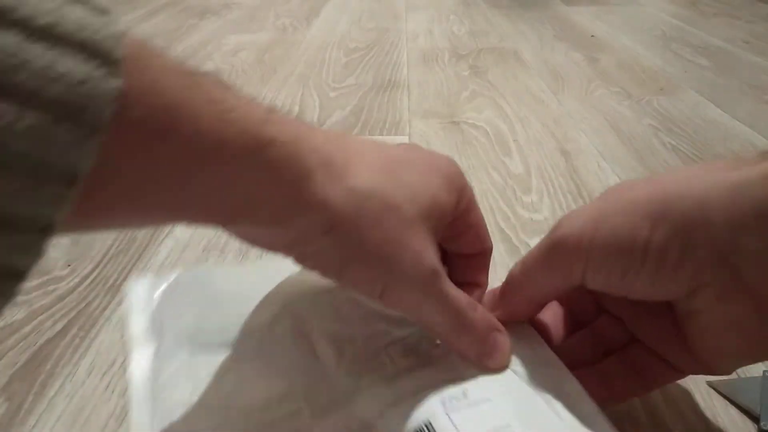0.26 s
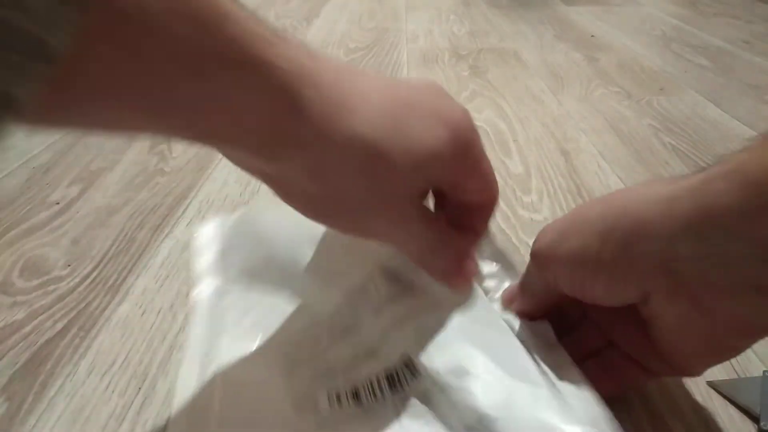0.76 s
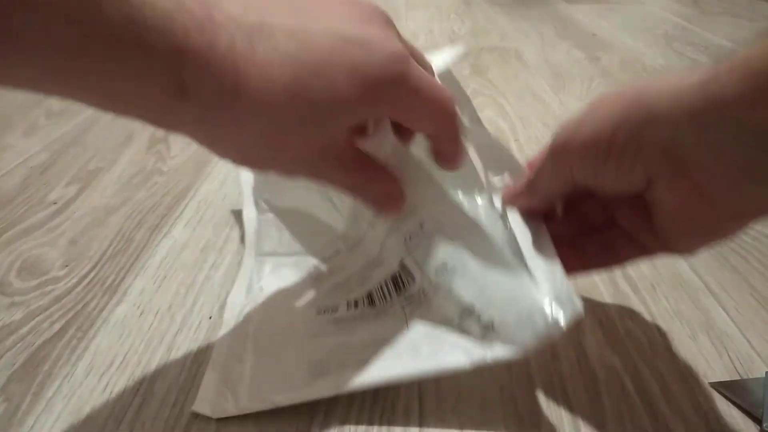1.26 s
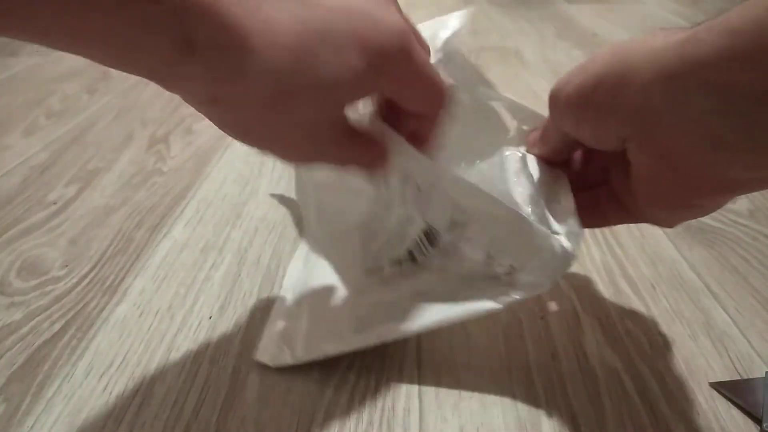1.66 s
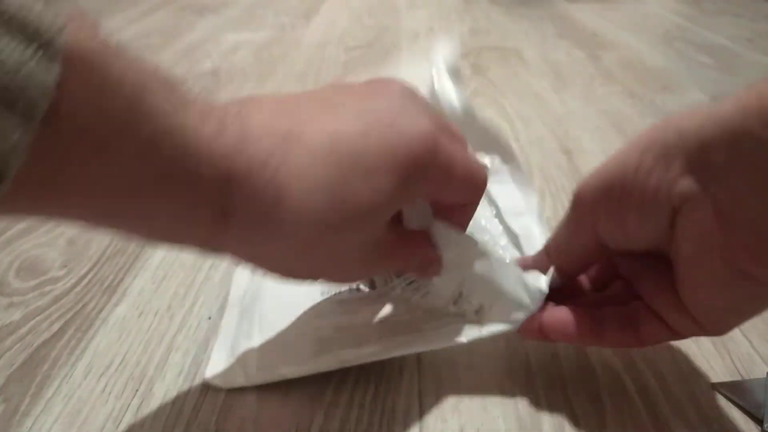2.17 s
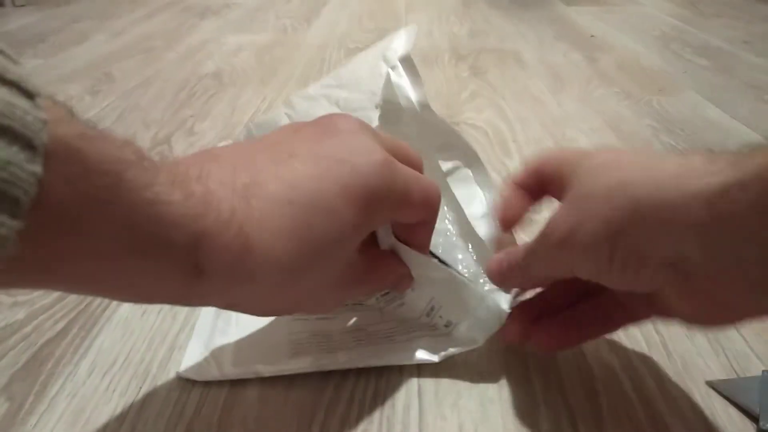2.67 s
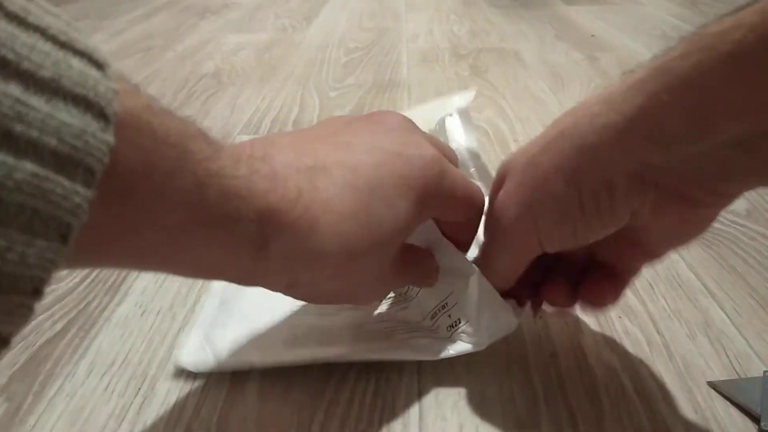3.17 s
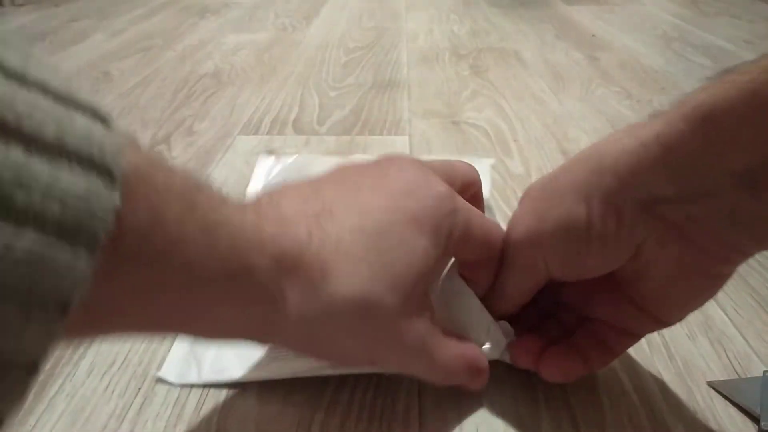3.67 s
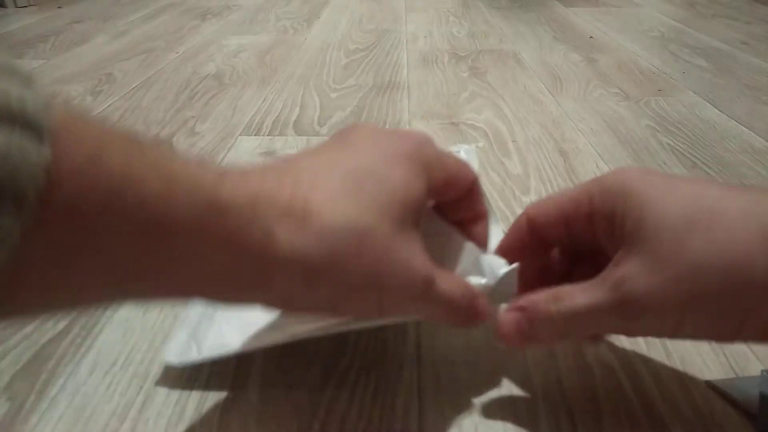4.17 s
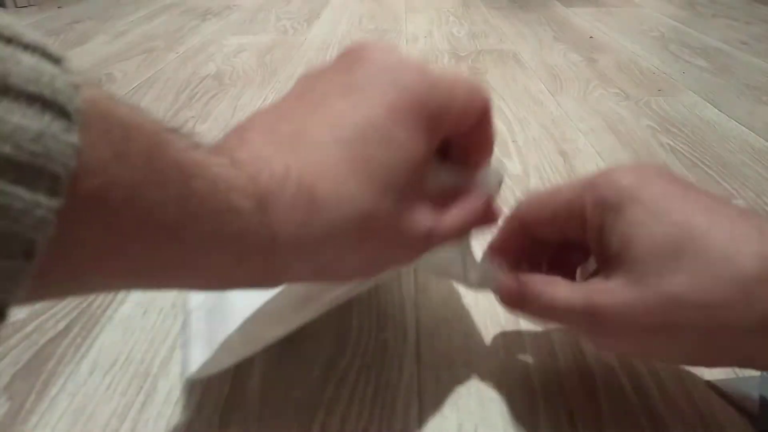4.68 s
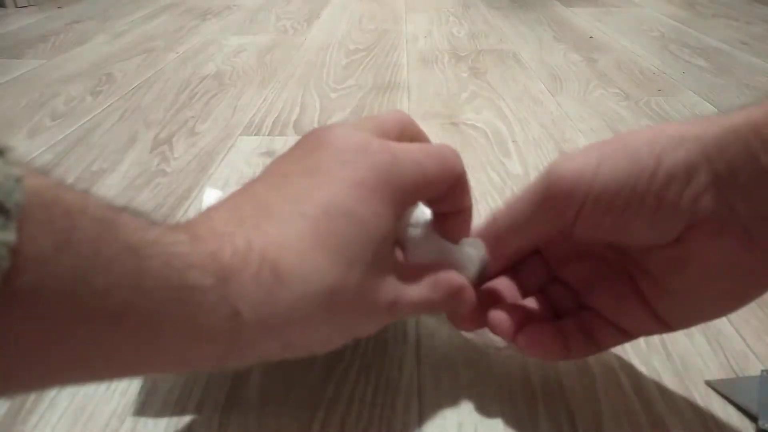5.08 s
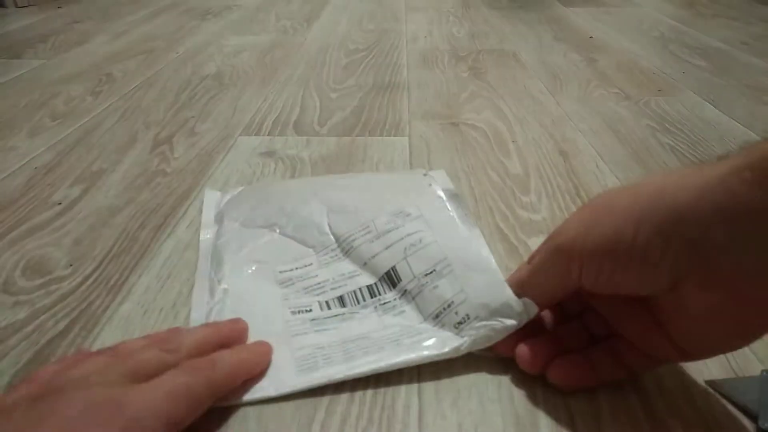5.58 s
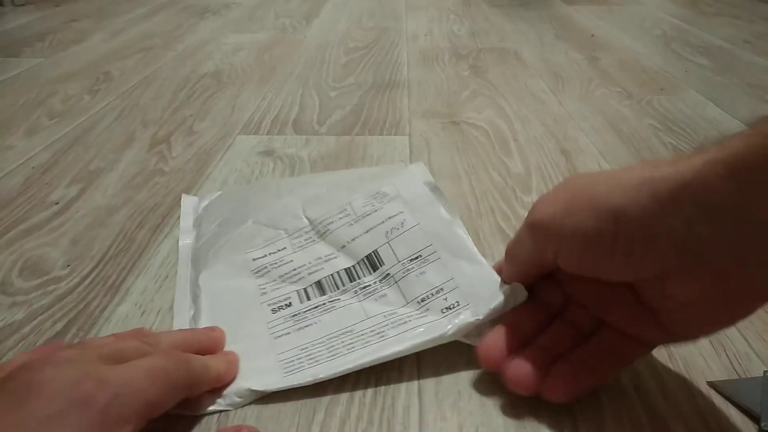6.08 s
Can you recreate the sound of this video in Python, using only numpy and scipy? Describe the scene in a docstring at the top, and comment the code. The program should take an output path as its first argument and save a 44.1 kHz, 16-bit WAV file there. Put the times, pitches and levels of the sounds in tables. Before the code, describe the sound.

A padded plastic mailer is pulled and torn open by hand, crinkling and rustling with sharp snaps, close up in a quiet room.

```python
"""A padded plastic mailer snaps and crackles as hands pull and tear it on a laminate floor.
Creases in the film buckle: large ones as separate snaps, countless small ones as crackle over rubbing hiss.
Broad panels flap and drag with a duller, hollow rustle; film swishes on film; the bag bumps the floor.
A quiet room answers. The two-port microphone is close."""
import sys
import numpy as np
from scipy import signal
from scipy.fft import rfft, irfft
from scipy.io import wavfile

SR = 44100
rng = np.random.default_rng(int(sys.argv[2]) if len(sys.argv) > 2 else 0)


def waveform_to_disk(signal):
    """Save audio, clipped to [-1, 1], as 16-bit WAV at the path in sys.argv[1]."""
    frames = np.transpose(np.atleast_2d(signal))
    scaled = np.clip(frames, -1, 1) * 32767
    samples = np.round(scaled).astype(np.int16)
    wavfile.write(sys.argv[1], SR, samples)


N = 278712
PORT_LAG_S, PORT_LAG_SPREAD_S = .00003, .00005   # left behind right; scatter over the bag
TUG_RISE_S, TUG_FALL_S = 0.014, 0.031   # time constants

# Large creases buckling: start_s, crack_db, ring_db, ring_hz, flap_db
SNAPS = [(0.0288, -21.5, -26, 3650, -53), (0.237, -42, -33, 1860, -43), (0.268, -23, -40, 1710, -34),
         (0.279, -18, -24.5, 4340, -28.5), (0.409, -25.5, -28, 1930, -31), (0.579, -24.5, -43, 2100, -36),
         (0.611, -27, -34, 1900, -46), (0.6352, -54, -65, 1160, -29.5), (0.6997, -19.5, -50, 2000, -48),
         (0.8397, -19, -23.5, 2100, -18.5), (0.8616, -23, -31, 1770, -16.5), (0.876, -36, -32, 1140, -26),
         (0.9012, -12.5, -27, 1920, -41), (0.954, -23.5, -39, 3340, -58), (1.155, -24, -33, 4600, -60),
         (1.329, -8, -45, 1130, -40), (1.4247, -23, -52, 3850, -41), (1.52, -17, -58, 1470, -25.5),
         (1.5608, -20, -34, 2680, -38), (1.631, -14, -22.5, 3680, -26.5), (1.969, -22, -32, 3900, -44),
         (2.199, -18, -41, 4350, -61), (2.279, -40, -45, 885, -51), (2.2966, -25, -27, 4070, -25),
         (2.3108, -18, -36, 3200, -58), (2.3143, -33, -41, 3700, -56), (2.321, -42, -34, 3900, -60),
         (2.339, -30.5, -28.5, 3340, -36), (2.5564, -32, -64, 1160, -35.5), (2.706, -39, -52, 1090, -35.5),
         (2.9469, -17.5, -37.5, 2100, -63), (2.9585, -25, -44, 3500, -60),
         (2.9828, -17.5, -24.5, 4100, -34), (3.0027, -19, -46, 4000, -37.5), (3.041, -23.5, -54, 4600, -65),
         (3.061, -20, -40, 3570, -65), (3.1324, -30.5, -34, 3000, -62), (3.181, -31, -46, 4300, -40.5),
         (3.3142, -40, -37, 2530, -44), (3.3337, -4, -27, 3490, -25), (3.345, -40, -44, 550, -38),
         (3.366, -40, -45, 390, -50), (3.371, -24.5, -48, 3000, -47), (3.41, -46, -42, 1120, -47),
         (3.4148, -46, -37.5, 2400, -40), (3.4325, -22, -33.5, 3570, -34.5), (3.4569, -23, -37, 3600, -33),
         (3.558, -27, -36, 3400, -38), (3.7075, -25, -43, 3600, -37.5), (3.784, -27, -38, 2530, -36),
         (3.847, -25.5, -38.5, 3770, -47), (3.9064, -11.5, -17.5, 4550, -31), (3.9203, -23, -42, 3700, -55),
         (3.929, -19, -40, 4570, -60), (4.002, -28, -46, 3630, -40), (4.0193, -22, -44, 1070, -67),
         (4.032, -20.5, -31.5, 2900, -50), (4.057, -24.5, -42, 2620, -56), (4.1716, -15, -39, 3370, -47),
         (4.1822, -14, -28, 4250, -48), (4.206, -25, -50, 3650, -60), (4.281, -27, -37.5, 1810, -39.5),
         (4.4084, -24, -48, 3890, -48), (4.45, -19.5, -29, 4100, -60), (4.4543, -20, -33, 4100, -60),
         (4.556, -23.5, -45, 4000, -60), (4.649, -32, -32, 3900, -55), (4.474, -16, -24, 4150, -50),
         (4.5072, -22, -20, 3630, -30.5), (4.514, -21, -48, 2210, -66), (4.5593, -7.5, -32, 3500, -35),
         (4.5645, -12, -48, 3900, -53), (4.606, -14, -25, 3580, -35), (4.613, -19, -31, 4030, -52),
         (4.675, -9, -20, 4800, -35), (4.6818, -15, -33, 3870, -37), (4.6843, -16, -50, 3000, -26.5),
         (4.697, -25, -39, 4030, -32), (4.742, -49, -50, 3000, -37), (4.805, -21.5, -63, 1510, -37),
         (4.844, -35, -45, 1640, -38), (4.97, -26, -36.5, 4500, -48), (5.0451, -11.5, -31, 5100, -35.5),
         (5.2338, -27, -40.5, 1760, -33.5), (5.276, -25.5, -40.5, 3530, -60),
         (5.4, -34, -32.5, 1980, -35.5), (5.401, -16.5, -27.5, 4300, -42), (5.5035, -44, -51, 1940, -35),
         (5.5982, -48, -37, 4600, -40), (5.6494, -35, -39, 3840, -55), (5.721, -31, -51, 4200, -51),
         (5.8381, -22.5, -25, 3700, -34), (5.879, -24, -32, 3280, -60), (5.943, -44, -37, 2990, -60),
         (5.951, -47, -37.5, 2720, -49), (5.9632, -38, -43, 3000, -53), (6.0826, -13, -28, 4400, -34),
         (6.119, -22, -34, 4660, -49), (6.1809, -13, -36, 4480, -28.5), (6.2601, -15, -46, 1580, -37)]


def snaps(size=1200, lead=60):
    """Each buckle, a step plus a short rattle, gives a crack, a top tick, a film ring and a panel flap."""
    crack, tick, flap = (6500, 9240, 0.009), (10000, 13500, 0.005), (300, 1800, 0.012)
    step_db, rise_s, echo_s, echo_db = 24, 0.0006, .00125, -12
    out, t = np.zeros((2, N + size)), (np.arange(size) - lead) / SR
    for start_s, crack_db, ring_db, ring_hz, flap_db in SNAPS:
        at = round(start_s * SR) - lead
        shared, *own = rng.standard_normal((3, size))
        lag = round((PORT_LAG_S + .5 * PORT_LAG_SPREAD_S * own[0][0]) * SR)
        step = np.zeros((2, size))
        step[[0, 1], [lead + lag, lead]] = from_db(step_db) * np.sign(shared[0])
        ring = (ring_hz / 1.13, ring_hz * 1.13, 0.009)
        parts = (crack_db, crack), (crack_db - 11, tick), (ring_db, ring), (flap_db, flap)
        for level_db, (low_hz, high_hz, t60_s) in parts:
            unlike = np.clip(low_hz / 6600, 0, 1)   # short waves differ more between ports
            rattle = shared * (1 - unlike) + unlike * np.array(own)
            envelope = np.where(t < 0, np.exp(t / rise_s), from_db(-60 * t / t60_s))
            burst = band(step + rattle * envelope, low_hz, high_hz)
            out[:, at:at + size] += burst * from_db(level_db) / np.abs(burst).max(axis=1, keepdims=True)
    echo = round(echo_s * SR)   # off the laminate
    out[:, echo:] += from_db(echo_db) * out[:, :-echo]
    return signal.sosfilt(signal.butter(4, 13500, fs=SR, output="sos"), out[:, :N])


def settling(t60_s, offset_db):
    """Crackle envelope of neighbouring creases giving way after each snap."""
    kicks = np.full(N, 1e-18)
    for start_s, crack_db, ring_db, _, _ in SNAPS:
        kicks[round(start_s * SR)] = from_db(max(crack_db, ring_db))
    return from_db(offset_db) * decay(kicks, t60_s)


# Steady grip on the film: time_s, crackle_db
GRIP = [(0, -48.5), (.5, -48.5), (1.0, -46.5), (1.45, -50.5), (1.7, -45.5), (2.1, -47), (2.36, -46.5),
        (2.47, -55.5), (2.85, -52.5), (3.15, -50.5), (3.5, -45), (3.6, -51.5), (4.35, -51), (4.8, -46.5),
        (4.95, -53.5), (5.2, -52.5), (5.36, -57), (5.5, -44.5), (5.68, -55.5), (5.83, -50.5), (6.02, -46.5),
        (6.32, -46.5)]
# Tugs at the bag: start_s, held_s, crackle_db, rustle_db
TUGS = [(0.016, 0.085, -44.5, -69), (0.205, 0.076, -42, -59.5), (.31, 0.12, -48.5, -61.5),
        (.56, 0.038, -44, -58.5), (0.697, 0.096, -41.5, -63), (0.841, 0.064, -38, -44.5),
        (1.031, 0.015, -47, -76), (1.516, 0.12, -40, -53), (1.763, 0.11, -46, -60.5),
        (1.95, 0.04, -42.5, -63), (2.18, 0.16, -44, -79), (2.315, 0.044, -39.5, -61),
        (2.501, 0.12, -69, -64.5), (2.92, 0.022, -43, -57), (3.324, 0.084, -44.5, -54),
        (3.4, 0.081, -63, -61), (3.652, 0.11, -45, -59.5), (3.886, 0.02, -42.5, -54.5),
        (4.003, 0.048, -46.5, -57), (4.165, 0.0069, -40.5, -54.5), (4.27, 0.016, -49.5, -59),
        (4.5, 0.036, -42, -74), (4.598, 0.1, -40.5, -52.5), (4.685, 0.068, -59, -46.5),
        (5.031, 0.039, -46.5, -60.5), (5.198, 0.051, -42.5, -55.5), (5.48, 0.027, -66, -57),
        (5.56, 0.039, -49.5, -57.5), (5.84, 0.11, -56, -56.5), (6.071, 0.1, -48, -62),
        (6.16, 0.03, -44.5, -58)]


def handling(grip_rustle_db=-15.5):
    """Crackle and rustle envelopes: grip and tugs add in power."""
    grip = from_db(np.interp(np.arange(N) / SR, *np.transpose(GRIP)))
    power = np.outer(from_db([0, grip_rustle_db]), grip) ** 2
    for start_s, held_s, crackle_db, rustle_db in TUGS:
        tug = swell(start_s, held_s, TUG_RISE_S, TUG_FALL_S)
        power += np.outer(from_db([crackle_db, rustle_db]), tug) ** 2
    return np.sqrt(power)


def creases(rate_per_s, low_hz, high_hz, cycles, uneven_db, clump_db):
    """Small buckles in clumps; each rings a few cycles at a pitch set by its size, from its own spot."""
    at = np.flatnonzero(rng.random(N) < rate_per_s * from_db(clump_db * drift(70)) / SR)
    strength = from_db(uneven_db * np.minimum(rng.exponential(1, N), 2.3))[at]
    strength *= rng.choice([-1, 1], N)[at]
    lag = np.round((PORT_LAG_S + PORT_LAG_SPREAD_S * rng.standard_normal(N)[at]) * SR).astype(int)
    pan = from_db(5 * rng.standard_normal(N)[at])
    pitch_index = rng.integers(0, 12, N)[at]
    out = np.zeros((2, N))
    for k, pitch_hz in enumerate(np.geomspace(low_hz, high_hz, 12)):
        chosen, clicks = pitch_index == k, np.full((2, N), 1e-18)
        clicks[0, np.clip(at + lag, 0, N - 1)[chosen]] = (strength * pan)[chosen]
        clicks[1, at[chosen]] = (strength / pan)[chosen]
        spells = from_db(5.5 * drift(7.2))
        out += signal.lfilter([1, -1], poles(pitch_hz, t60_s=cycles / pitch_hz), clicks * spells)
    return rms_one(out)


def rubbing(low_hz, high_hz, coherence, flicker_db, bands=6):
    """Friction hiss; bands flicker partly together, and coherence is the power share common to the ports."""
    common_flicker, out = drift(16.2), 0
    edges_hz = np.geomspace(low_hz, high_hz, bands + 1)
    for low, high in zip(edges_hz, edges_hz[1:]):
        shared, *own = rng.standard_normal((3, N))
        noise = np.sqrt(coherence) * shared + np.sqrt(1 - coherence) * np.array(own)
        flicker = from_db(flicker_db * (common_flicker + 1.53 * drift(10)))
        out = out + band(noise, low, high) * flicker
    return rms_one(out)


def crackle():
    """Small creases buckle over the hiss of film rubbing film and skin."""
    buckles = creases(1100, 1140, 10500, cycles=5, uneven_db=5, clump_db=4.5)
    hiss = rubbing(1170, 13730, coherence=0.054, flicker_db=2.13)
    return coloured(buckles + from_db(2) * hiss)


def rustle():
    """Broad panels flap and drag, sounding the hollow bag."""
    flaps = creases(400, 234, 2150, cycles=1.5, uneven_db=0.5, clump_db=4)
    drag = rubbing(91, 2230, coherence=1, flicker_db=2.1)
    return coloured(flaps + from_db(-2) * drag) + from_db(-5) * hollow()


# Modes of the bag: pitch_hz, t60_s
BAG_MODES = [(135, .05), (215, 0.074), (270, 0.075), (335, 0.075), (495, 0.046), (870, 0.042),
             (1050, 0.029)]


def hollow():
    """Flexing panels keep the bag's modes murmuring, each in its own spells."""
    out = np.zeros(N)
    for pitch_hz, t60_s in BAG_MODES:
        push = rng.standard_normal(N) * from_db(6.3 * drift(10.2))
        out += rms_one(signal.lfilter([1, 0, -1], poles(pitch_hz, t60_s), push))
    return rms_one(out)


# Film slips: start_s, held_s, level_db
SLIDES = [(.7, 0.05, -42), (.905, 0.014, -43), (1.53, 0.064, -44), (1.65, 0.025, -51), (1.75, 0.081, -46.5),
          (2.2, 0.082, -46.5), (3.05, 0.0076, -46), (4.168, 0.011, -37.5)]


def slides():
    """Film slides on film with a bright, smooth swish."""
    envelope = sum(from_db(level_db) * swell(start_s, held_s, rise_s=0.0017, fall_s=0.013)
                   for start_s, held_s, level_db in SLIDES)
    return envelope * coloured(rubbing(7270, 13900, coherence=0.22, flicker_db=2.1, bands=4))


def rasp(start_s=4.595, held_s=0.053, level_db=-44, band_hz=(3000, 4600)):
    """The main pull scrapes the flap: a scratch of dense small creases."""
    scratch = band(creases(1600, *band_hz, cycles=6.4, uneven_db=1, clump_db=3.5), *band_hz)
    return from_db(level_db) * swell(start_s, held_s, TUG_RISE_S, TUG_FALL_S) * rms_one(scratch)


# Bag knocking the floor: start_s, kick_db
BUMPS = [(2.399, -62), (2.495, -55), (4.804, -54.5), (5.559, -54.5)]


def bumps():
    """A soft landing and a short drag ring the bag's modes."""
    start_s, kick_db = np.transpose(BUMPS)
    kicks = np.full(N, 1e-18)
    kicks[np.round(start_s * SR).astype(int)] = from_db(kick_db)
    landing = from_db(9.5) * band(kicks, 52, 413)
    drag = from_db(-30) * decay(kicks, t60_s=0.57)
    out = np.zeros(N)
    for pitch_hz, t60_s in BAG_MODES:
        force = landing + drag * rng.standard_normal(N)
        out += signal.lfilter([0, np.sin(2 * np.pi * pitch_hz / SR)], poles(pitch_hz, t60_s), force)
    return band(out, 178, 800)


def room(x, t60_s=.18, level_db=-23):
    """Diffuse reflections: a decaying noise tail, different at each port."""
    t = np.arange(SR // 2) / SR
    tail = rng.standard_normal((2, len(t))) * from_db(-60 * t / t60_s) * (t > .003)
    tail = band(tail, 120, 7000)
    tail /= np.sqrt(np.sum(tail ** 2, axis=1, keepdims=True))
    return from_db(level_db) * signal.fftconvolve(x, tail, axes=1)[:, :N]


def background(level_db=-62):
    """Faint, flickering broadband hiss."""
    return from_db(level_db) * coloured(rubbing(56, 13600, coherence=0.055, flicker_db=1.8))


# Joint response of film and microphone: freq_hz, gain_db
RESPONSE = [(25, -8.5), (110, -3), (300, -7), (600, -5.5), (1400, -11), (4500, -0.5), (4900, -8.5),
            (5700, -7), (7200, 0.5), (9000, 0.5), (11000, -6), (14200, -7.5), (14700, -36), (16400, -48)]


def coloured(x, size=4096):
    """Apply RESPONSE at minimum phase; unit rms."""
    freq_hz, gain_db = np.transpose(RESPONSE)
    grid_hz = np.maximum(np.fft.rfftfreq(size, 1 / SR), 1)
    cepstrum = irfft(np.interp(np.log(grid_hz), np.log(freq_hz), gain_db) * np.log(10) / 20)
    cepstrum[1:size // 2] *= 2
    cepstrum[size // 2 + 1:] = 0
    impulse = irfft(np.exp(rfft(cepstrum)))
    return rms_one(signal.fftconvolve(x, impulse[None], axes=1)[:, :N])


def swell(start_s, held_s, rise_s, fall_s):
    """Flat hold with exponential flanks."""
    t = np.arange(N) / SR
    return np.exp(np.minimum(0, np.minimum((t - start_s) / rise_s, (start_s + held_s - t) / fall_s)))


def decay(kicks, t60_s):
    """Exponential tail on each kick."""
    return signal.lfilter([1], [1, -from_db(-60 / (t60_s * SR))], kicks)


def poles(pitch_hz, t60_s):
    """Denominator of a damped resonator."""
    r = from_db(-60 / (t60_s * SR))
    return [1, -2 * r * np.cos(2 * np.pi * pitch_hz / SR), r * r]


def drift(corner_hz):
    """Low-passed noise; unit rms."""
    r = np.exp(-2 * np.pi * corner_hz / SR)
    return rms_one(signal.lfilter([1], [1, -2 * r, r * r], rng.standard_normal(N + SR))[SR:])


def band(x, low_hz, high_hz):
    """Butterworth band-pass."""
    return signal.sosfilt(signal.butter(2, [low_hz, high_hz], "band", fs=SR, output="sos"), x + 1e-18)


def rms_one(x):
    """Scale to unit rms."""
    return x / np.sqrt(np.mean(x ** 2) + 1e-20)


def from_db(db):
    """Decibels to gain."""
    return 10 ** (np.asarray(db) / 20)


def scene():
    """Crackle and rustle follow the handling; the other bag sounds ride on top, all in the room."""
    crackle_gain, rustle_gain = handling()
    crackle_gain += settling(t60_s=0.029, offset_db=-23)
    bag = crackle_gain * crackle() + rustle_gain * rustle() + slides() + rasp() + snaps() + bumps()
    return bag + background() + room(bag)


def record(dry, bass_hz=463, treble_hz=6500, cutoff_hz=16600):
    """The right port is thin in the bass and duller on top; both are low-passed."""
    left, right = dry
    bass = signal.sosfiltfilt(signal.butter(3, bass_hz, fs=SR, output="sos"), right)
    treble = signal.sosfiltfilt(signal.butter(3, treble_hz, "high", fs=SR, output="sos"), right)
    right = from_db(-0.2) * (right - 0.79 * bass - 0.25 * treble)
    return signal.sosfilt(signal.cheby2(16, 60, cutoff_hz, fs=SR, output="sos"), np.array([left, right]))


dry = scene()
out = record(dry)
waveform_to_disk(out)
```